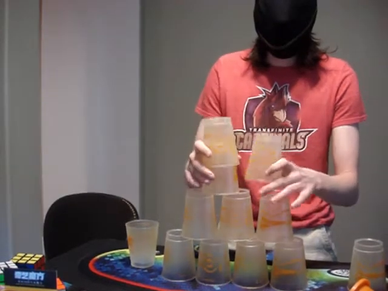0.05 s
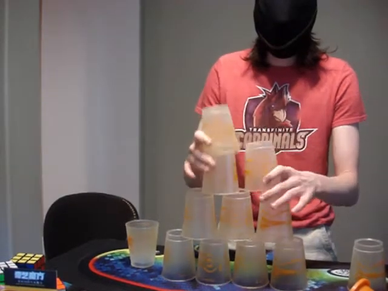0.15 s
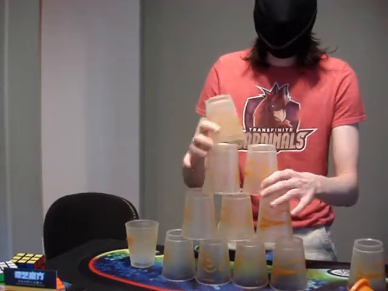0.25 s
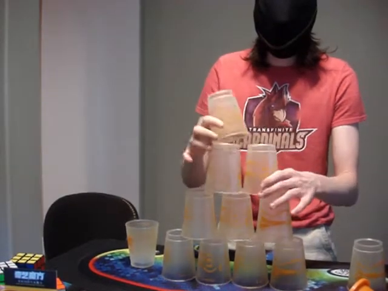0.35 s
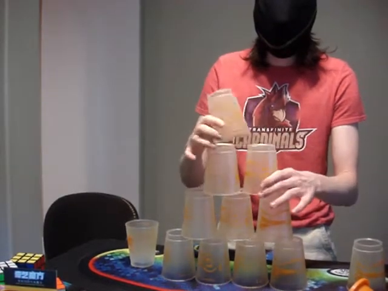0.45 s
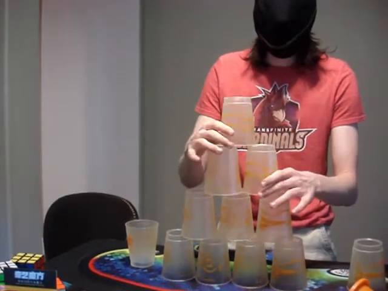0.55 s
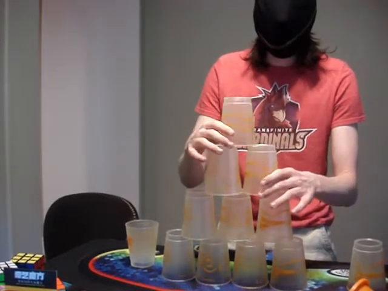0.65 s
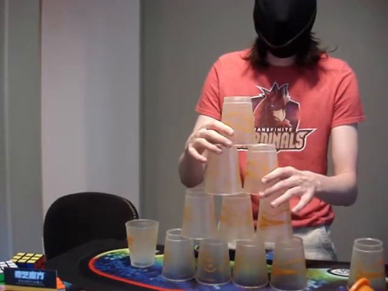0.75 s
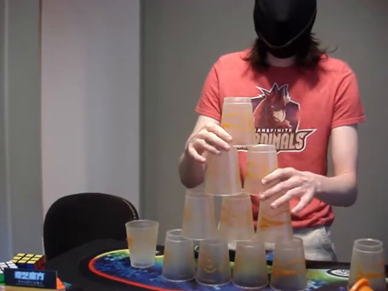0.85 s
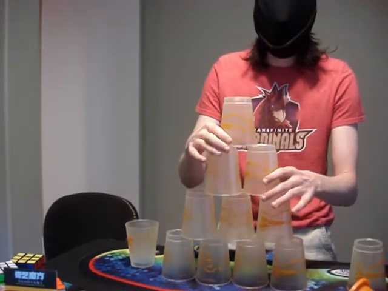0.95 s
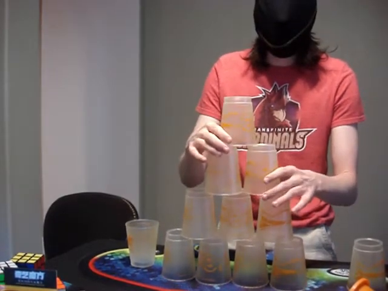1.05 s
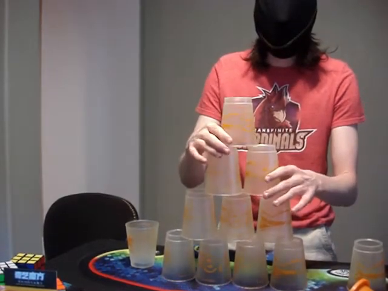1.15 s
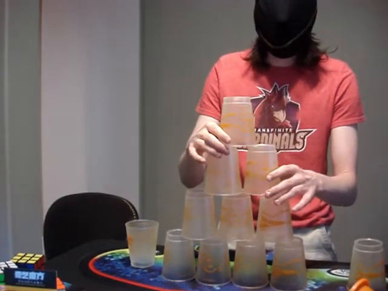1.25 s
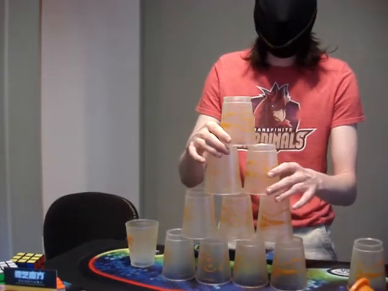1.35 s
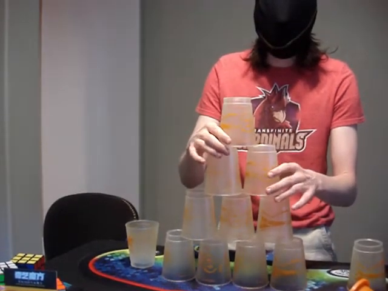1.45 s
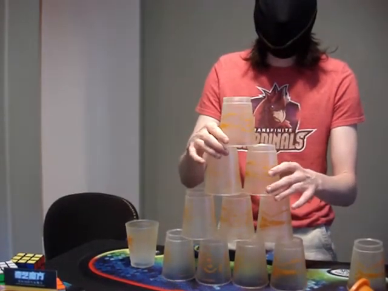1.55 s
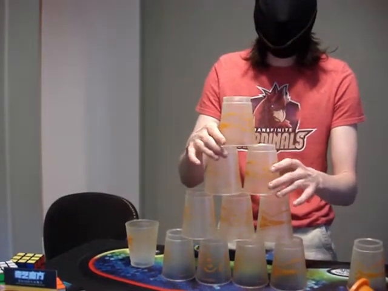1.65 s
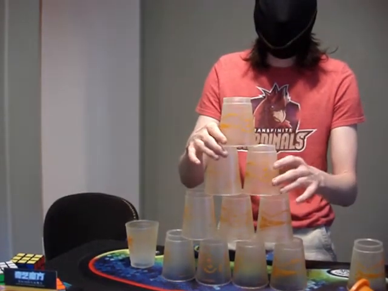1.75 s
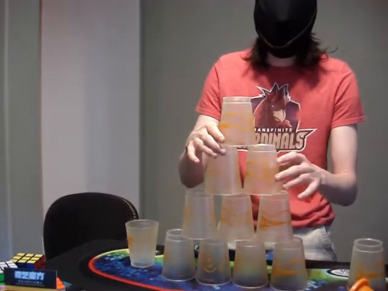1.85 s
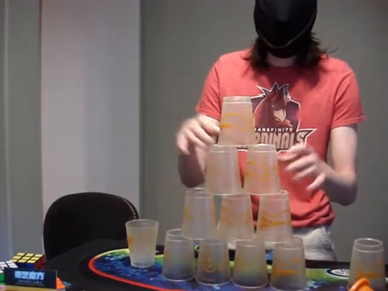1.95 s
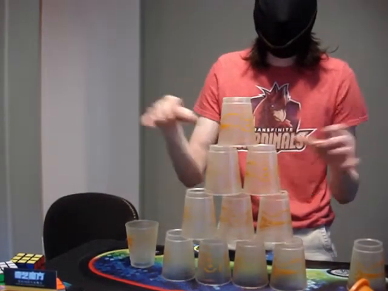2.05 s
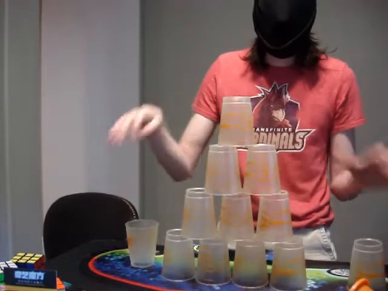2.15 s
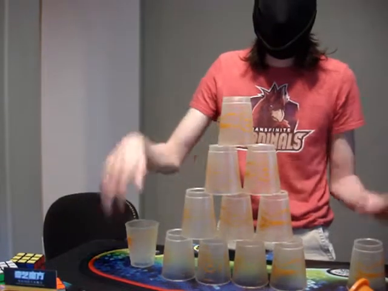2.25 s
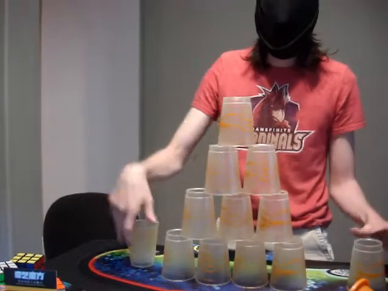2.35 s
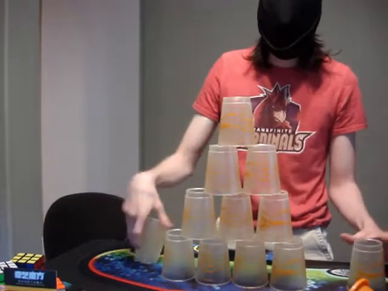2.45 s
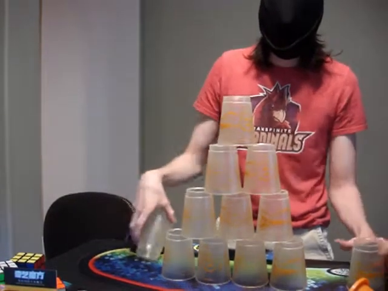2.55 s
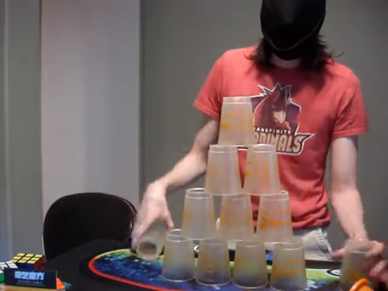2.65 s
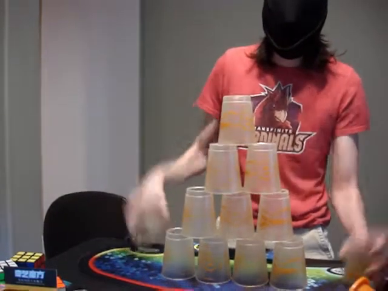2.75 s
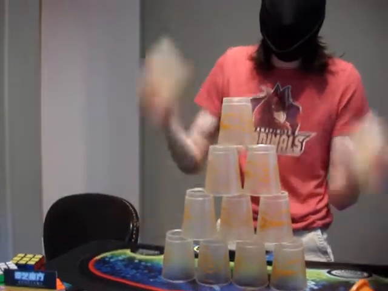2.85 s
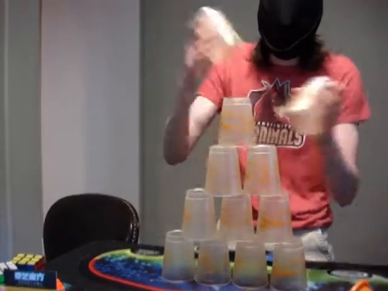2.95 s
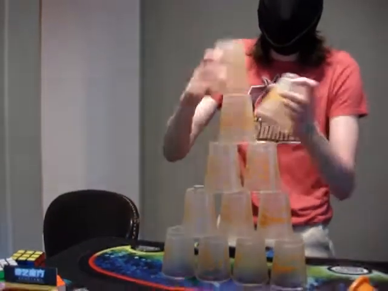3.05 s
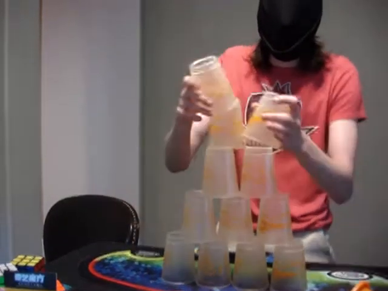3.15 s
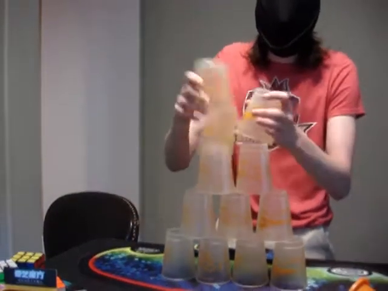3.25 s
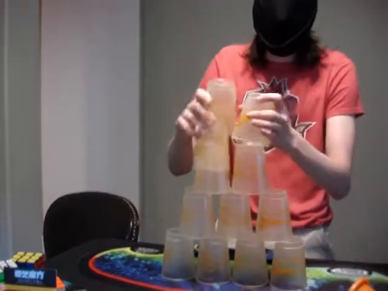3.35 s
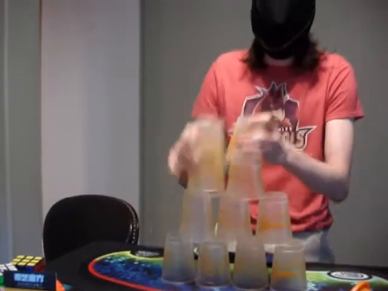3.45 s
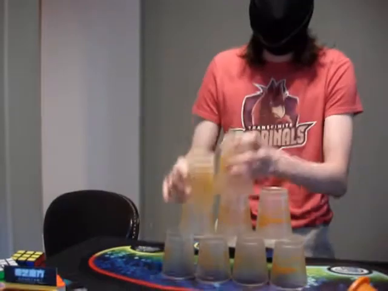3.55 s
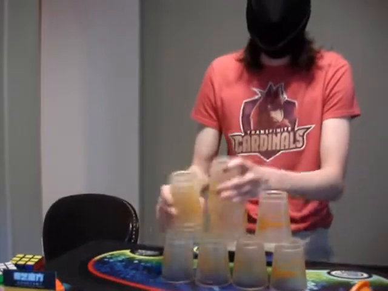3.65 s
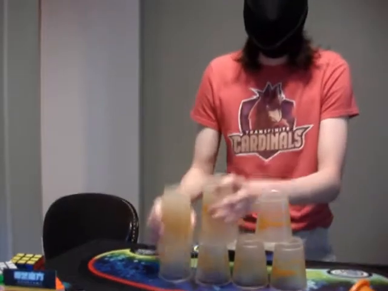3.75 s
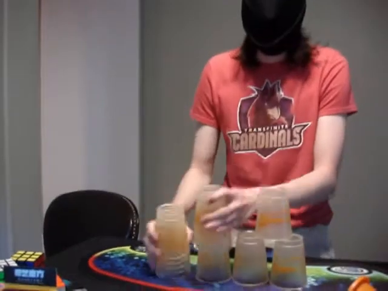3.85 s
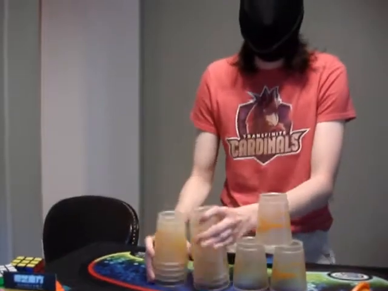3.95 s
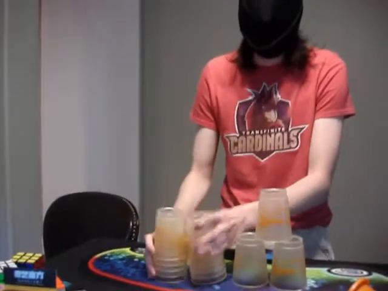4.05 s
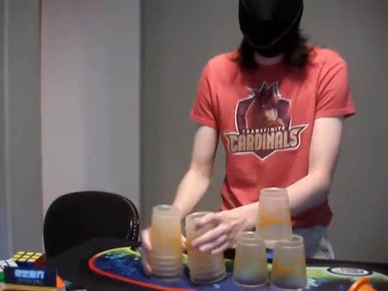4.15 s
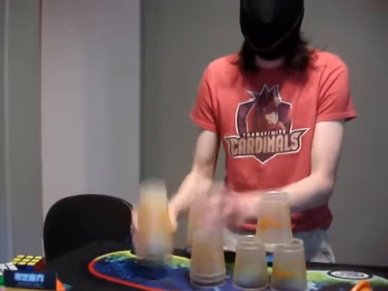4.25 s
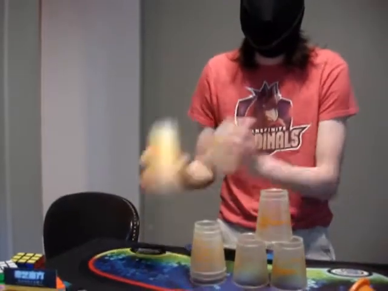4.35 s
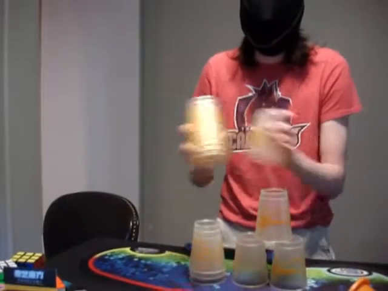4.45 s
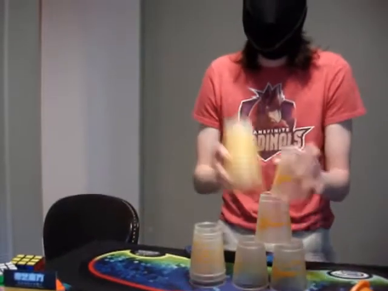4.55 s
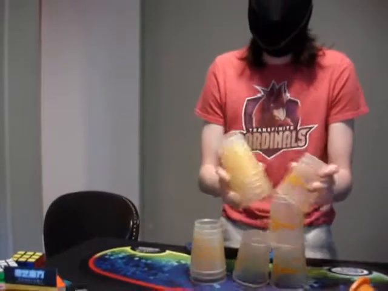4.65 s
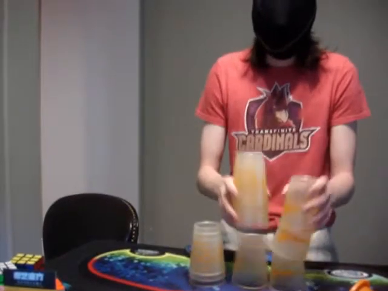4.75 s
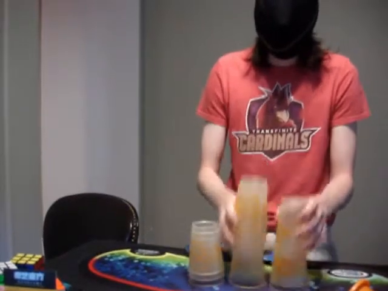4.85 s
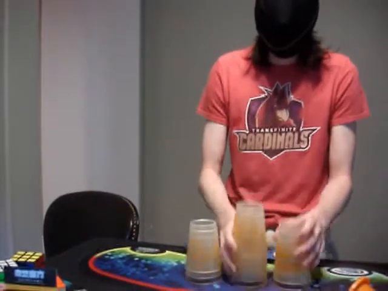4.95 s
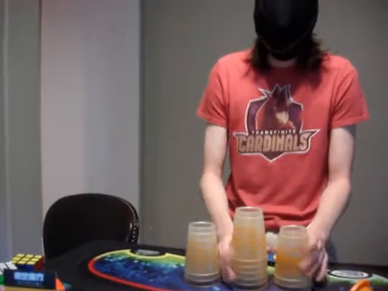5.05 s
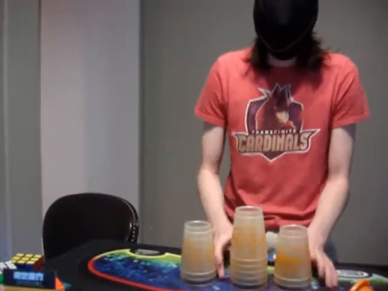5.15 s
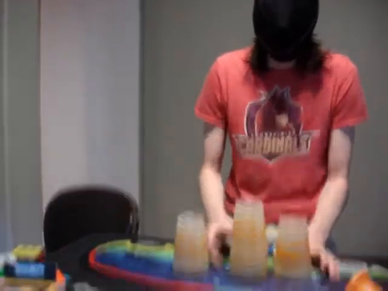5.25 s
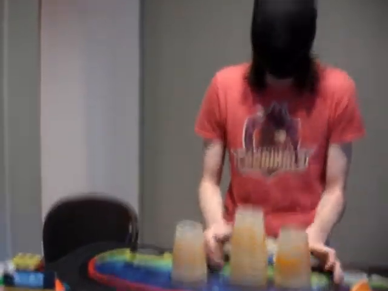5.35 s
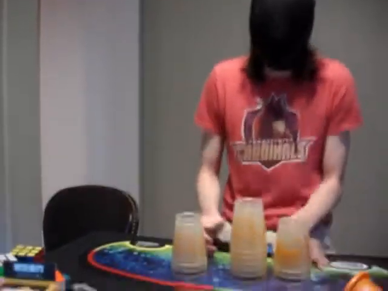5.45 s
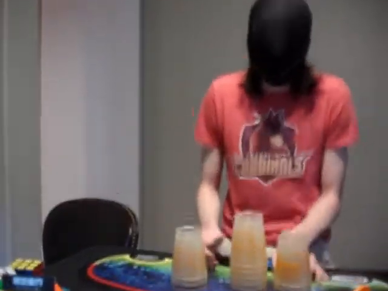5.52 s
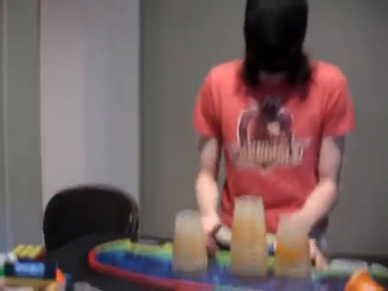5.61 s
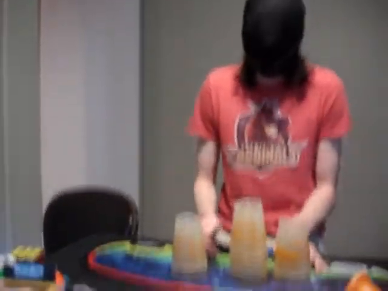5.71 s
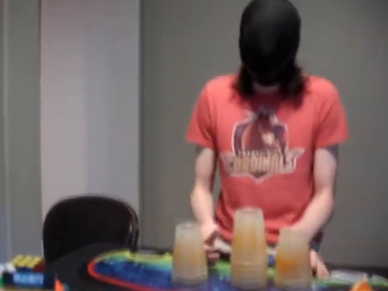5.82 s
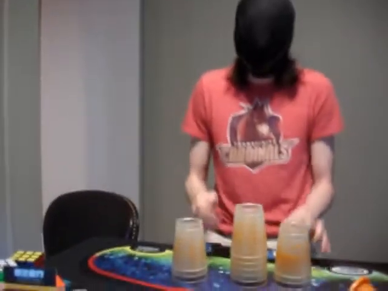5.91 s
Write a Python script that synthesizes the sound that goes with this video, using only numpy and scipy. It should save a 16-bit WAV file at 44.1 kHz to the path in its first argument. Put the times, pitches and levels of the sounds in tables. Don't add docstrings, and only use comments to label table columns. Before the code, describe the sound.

Close, bright clatter of hollow plastic cups being stacked and swept together in quick bursts, with dull table knocks over steady hiss.

```python
import sys
import numpy as np
from scipy import signal
from scipy.fft import rfft, irfft
from scipy.io import wavfile
from scipy.ndimage import uniform_filter1d, minimum_filter1d

SR = 44100
rng = np.random.default_rng(int(sys.argv[2]) if len(sys.argv) > 2 else 0)


def generate_wav(signal):
    frames = np.transpose(np.atleast_2d(signal))
    scaled = np.clip(frames, -1, 1) * 32767
    pcm = np.round(scaled).astype(np.int16)
    wavfile.write(sys.argv[1], SR, pcm)


def convert_level_to_amplitude(level_db):
    exponent = np.asarray(level_db, float) / 20
    return 10 ** exponent


N = 263702

# start in seconds, rim tick peak in dB, air note in dB, wall note in Hz, wall
# note in dB.
BUILD_HITS = [(0.0034, -36, -32, 900, -31.5), (0.0326, -31.5, -37, 980, -29.5),
              (0.0414, -34, -29, 846, -33), (0.2044, -12.5, -8.5, 994, -18),
              (0.2568, -12, -15.5, 1276, -13), (0.2793, -12, -14.5, 1226, -16),
              (0.4229, -18, -23, 1297, -20), (0.4415, -3.5, -12.5, 1200, -9),
              (0.5232, -15, -10.5, 1300, -13.5), (0.5362, -9.5, -17.5, 1444, -12),
              (0.5761, -3.5, -8, 1030, -8), (0.5874, -10, -8, 1180, -8.5), (0.5994, -29, -30, 1100, -43),
              (0.9034, -35, -31, 1050, -37), (0.9218, -27, -28.5, 980, -28.5),
              (1.0021, -31, -28, 1046, -26), (1.1544, -28.5, -35, 925, -39)]
DOWN_STACK_HITS = [(3.1098, 1.5, -5, 1021, 0.5), (3.1211, 3, -11.5, 1432, 2), (3.1324, -14, -36, 1530, -16.5),
                   (3.1494, 0.5, -8.5, 961, -14), (3.1654, -15, -23, 1090, -7), (3.1896, -14, -10.5, 1547, -9),
                   (3.2044, -5.5, -12, 1430, -24), (3.2193, -33, -22, 1186, -10), (3.3134, -10, -20, 1040, -20),
                   (3.3292, -0.5, -10.5, 1093, -9.5), (3.337, -5.5, -21, 957, -14), (3.3438, -36, -30, 1266, -11),
                   (3.3852, -17, -18.5, 1174, -17), (3.4299, -8, -15.5, 900, -18), (3.4501, -7.5, -19, 980, -15.5),
                   (3.4706, -1.5, -10.5, 920, -6.5), (3.4894, -15, -13, 930, -32), (3.5552, 2.5, -25, 984, -15),
              (3.6044, 1.5, -23, 1507, -3.5), (3.6116, -4, -17.5, 1640, -11),
              (3.6533, -9, -27.5, 1535, -14), (3.6755, -3.5, -9, 953, -8.5), (3.746, -0.5, -29, 914, -6.5),
              (3.8255, -1, -15, 1116, -13), (3.8405, -24, -39, 988, -20), (3.8796, -2, -19.5, 1780, -9),
              (3.922, -5, -40, 1710, -18), (3.968, -17, -42, 1750, -17), (4.011, 1.5, -16, 1447, -11.5),
              (4.0494, -44, -41, 1496, -28), (4.0675, -48, -27, 1550, -19.5), (4.1224, -20, -31, 1670, -27)]
CLOSE_HITS = [(4.5994, -0.5, -9.5, 1247, -6.5), (4.6119, -3, -23, 1270, -10), (4.6249, -5, -4.5, 990, -22),
              (4.6364, -1, -26, 1240, -6.5), (4.6544, -40, -40, 1200, -14),
              (4.6744, -11, -15.5, 1220, -11.5), (4.6844, -12, -24, 1180, -24.5),
              (4.782, -20, -34, 1000, -23), (4.7985, -6.5, -39, 920, -16.5), (4.8179, -6.5, -18, 902, -46),
              (4.8663, -19, -23, 1033, -22), (4.9177, 3, -14.5, 1550, -7.5), (4.9302, -8.5, -52, 1330, -11),
              (4.9844, -8, -29, 1290, -15.5), (5.0145, 1, -13.5, 1510, -9.5),
              (5.0394, -31, -19, 1670, -18.5)]
# start in seconds, rim tick peak in dB.
FINGER_TOUCHES = [
    (2.7085, -24),
    (2.7162, -24),
    (5.2655, -28),
    (5.3144, -24),
    (5.5104, -25),
    (5.6865, -32),
    (5.7867, -25),
]
# frequency in Hz, width in Hz, level in dB.
RIM_MODES = [(1954, 830, 6), (3280, 470, 5.5), (4380, 970, 1), (5680, 410, 2), (6390, 890, -1),
             (7310, 3630, -8), (14000, 5000, -18.5)]
# start in seconds, peak in dB, note of the struck spot in Hz.
TABLE_THUMPS = [(0.203, -31.5, 227), (0.263, -22.5, 170), (0.44, -23, 304), (0.576, -17, 190),
                (1.228, -27, 223), (2.476, -29.5, 207), (2.5, -36, 168), (2.714, -18.5, 186),
                (3.19, -18, 296), (3.33, -17.5, 323), (3.475, -16.5, 300), (3.677, -14, 295),
                (3.879, -12.5, 196.6), (3.908, -9.5, 161.5), (4.009, -18, 181), (4.331, -39.5, 115),
                (4.388, -38.5, 128), (4.6, -17.5, 275), (4.626, -9.5, 259.6), (4.826, -17.5, 206),
                (4.869, -13, 193.5), (5.024, -16, 180), (5.208, -21.5, 265.5), (5.264, -18, 293),
                (5.279, -22, 175), (5.513, -9.5, 242), (5.528, -12, 179), (5.548, -9.5, 199),
                (5.584, -31.5, 182)]
# frequency in Hz, level in dB, decay time T60 in seconds.
BOARD_MODES = [(124.1, -6, 0.28), (180, -4, 0.34), (242, -4, 0.052), (297.6, -1.5, 0.1), (375, -8.5, 0.082),
               (418, -10, 0.064)]
# start in seconds, length in seconds, peak in dB.
CUP_SLIDES = [
    (3.24, 0.26, -30),
    (3.46, 0.18, -20.5),
    (3.68, .17, -22),
    (3.89, .12, -31),
    (4.77, 0.19, -34),
    (4.91, 0.05, -30),
    (5.22, 0.14, -44),
    (5.51, 0.078, -40),
]
# frequency in Hz, level in dB per Hz.
SLIDE_SPECTRUM = [(100, -14.5), (300, -12), (600, 7.5), (1300, 5.5), (2100, -2), (5500, -10.5), (9800, -21),
                  (20000, -35)]
# start in seconds, length in seconds, peak in dB.
MAT_BRUSHES = [
    (2.43, 0.14, -55.5),
    (2.62, 0.15, -58.5),
    (2.702, 0.1, -44),
    (2.8, .24, -51.5),
    (4.295, 0.056, -41.5),
    (4.79, 0.23, -35.5),
    (5.19, 0.08, -54),
]
# start in seconds, peak in dB.
FAR_SLAPS = [
    (1.2171, -15),
    (1.2257, -11.5),
    (1.235, -14.5),
]
# frequency in Hz, width in Hz, level in dB.
SLAP_MODES = [(300, 330, -47), (637, 250, 13.5), (1200, 345, 15.5), (2110, 150, 18.5), (3000, 580, 9),
              (3700, 600, 10.5), (5400, 4000, -8), (14630, 480, -8)]
# start in seconds, frequency in Hz, level in dB, T60 in seconds.
THIN_PART_RING = (1.235, 2105.5, -26, 0.06)
# delay in seconds, level in dB.
FIRST_ECHOES = [
    (.0045, -14),
    (.0125, -9),
    (.0215, -15),
]
# frequency in Hz, T60 in seconds.
ROOM_DECAY = [(100, 0.24), (260, 0.73), (700, 0.45), (1840, 0.65), (4850, 0.7), (10000, 0.47)]
# frequency in Hz, level in dB per Hz.
HISS_SPECTRUM = [(12, -60.5), (20, -21.5), (91, -15.5), (114, -11), (230, -6), (250, -11), (360, -4.5),
                 (565, -7.5), (632, -4.5), (1140, -9), (1600, -10.5), (7690, -24.5), (9890, -35),
                 (10800, -65.5), (16400, -56)]
# frequency in Hz, gain in dB.
MIC_RESPONSE = [(20, 0), (90, -6), (125, 0), (9900, -3.5), (10150, -21), (11000, -25), (11800, -30),
                (13500, -19.5), (15600, -18), (15900, -56), (16700, -85)]

AIR_HZ, AIR_SCATTER = 620.5, 0.082
TOUCH_AIR_DB, TOUCH_WALL_DB, TOUCH_WALL_HZ = -13, -18.5, 1240
RIM_LAG_S = 0.0012
CHATTER_DB, CHATTER_S = -15, 0.0045
STIFF_RATIO, STIFF_T60 = 1.227, 0.055
SLIDE_PEAK, BRUSH_PEAK = 0.37, 0.12
TICK_ROOM_DB = -3
HISS_DB = -46.5
HUM_HZ, HUM_DB = 125.3, -65.5


def evened(x):
    return x / np.sqrt(np.mean(x ** 2) + 1e-20)


def peaked(x):
    return x / np.abs(x).max()


def read(points, hz):
    f, value = np.transpose(points)
    return np.interp(np.log(hz + 1), np.log(f + 1), value)


def add(mix, s, sound):
    part = mix[round(s * SR):][:len(sound)]
    part += sound[:len(part)]


def colour(x, points):
    gain = convert_level_to_amplitude(read(points, np.fft.rfftfreq(len(x), 1 / SR)))
    return irfft(rfft(x) * gain, len(x))


def ring(x, hz, width):
    r = np.exp(-np.pi * abs(width) / SR)
    angle = 2 * np.pi * hz / SR
    return signal.lfilter([1 - r * r], [1, -2 * r * np.cos(angle), r * r], x) * np.sin(angle)


def body(x, modes):
    return sum((-1) ** k * convert_level_to_amplitude(db) * ring(x, hz, width) for k, (hz, width, db) in enumerate(modes))


def note(hz, t60, rise):
    t = np.arange(round(0.6 * SR)) / SR
    swell = 1 - np.exp(-t / rise)
    return peaked(np.sin(2 * np.pi * hz * t) * swell * convert_level_to_amplitude(-60 * t / t60))


def stroke(rows, peak):
    out, t = np.zeros(N), np.arange(N) / SR
    for s, length, db in rows:
        u = np.clip((t - s) / length, 0, 1)
        out += convert_level_to_amplitude(db) * np.minimum(u / peak, (1 - u) / (1 - peak)) ** 0.46
    return out


def contacts():
    light = [(s, db, db + TOUCH_AIR_DB, TOUCH_WALL_HZ, db + TOUCH_WALL_DB) for s, db in FINGER_TOUCHES]
    rows = BUILD_HITS + DOWN_STACK_HITS + CLOSE_HITS + light
    grip = 1 + AIR_SCATTER * np.clip(rng.standard_normal(len(rows)), -2, 2)
    return [(s, tick_db, AIR_HZ * g, air_db, wall_hz, wall_db)
            for (s, tick_db, air_db, wall_hz, wall_db), g in zip(rows, grip)]


def rims(hits):
    out, t = np.zeros(N), np.arange(2000) / SR
    tick = np.diff(np.exp(-t / 0.00008), prepend=0)
    for s, tick_db, *_ in hits:
        chatter = convert_level_to_amplitude(CHATTER_DB) * rng.standard_normal(2000) * np.exp(-t / CHATTER_S)
        add(out, s + RIM_LAG_S, convert_level_to_amplitude(tick_db - 3.15) * peaked(body(tick + chatter, RIM_MODES)))
    return out


def cups(hits):
    out = np.zeros(N)
    for s, _, air_hz, air_db, wall_hz, wall_db in hits:
        _, below, above = rng.uniform(-2.12, 1, 3)
        air = note(air_hz, 0.016, 0.0092) + 0.18 * note(air_hz * 0.747, 0.034, 0.0021)
        add(out, s, convert_level_to_amplitude(air_db + 3) * air)
        near = note(wall_hz * (0.8 + 0.07 * below), 0.02, 0.0004)
        near = near + 0.5 * note(wall_hz * (1.12 + 0.05 * above), 0.02, 0.0004)
        add(out, s, convert_level_to_amplitude(wall_db + 2) * (note(wall_hz, 0.029, 0.0008) - 0.5 * near))
    return out


def knocks(hits):
    out = np.zeros(N)
    for s, _, _, air_db, _, wall_db in hits:
        c = rng.uniform(-1.6, 1, 2)
        low = note(820 * (1 + 0.1 * c[0]), 0.012, 0.0003)
        high = note(1250 * (1 + 0.12 * c[1]), 0.008, 0.0002)
        add(out, s, convert_level_to_amplitude((air_db + wall_db) / 2 - 4) * (low - 1.4 * high))
    return out


def table():
    out = np.zeros(N)
    for s, db, spot_hz in TABLE_THUMPS:
        share = rng.uniform(-1.9, 1, len(BOARD_MODES))
        board = sum(convert_level_to_amplitude(d + 2.8 * u) * note(hz, t60, 0.015) for (hz, d, t60), u in zip(BOARD_MODES, share))
        spot = note(spot_hz, 0.11, 0.0042)
        pressed = note(spot_hz * STIFF_RATIO, STIFF_T60, 0.0011)
        add(out, s, convert_level_to_amplitude(db - 5) * peaked(0.97 * board + 1.45 * spot + 0.7 * pressed))
    return out


def grains():
    force_db = 2.5 * np.minimum(rng.exponential(1, N), 3)
    touching = rng.random(N) < 0.15
    return rng.standard_normal(N) * convert_level_to_amplitude(force_db) * touching


def slides():
    return convert_level_to_amplitude(3) * stroke(CUP_SLIDES, SLIDE_PEAK) * evened(colour(grains(), SLIDE_SPECTRUM))


def brushes():
    rub = grains()
    return convert_level_to_amplitude(2) * stroke(MAT_BRUSHES, BRUSH_PEAK) * evened(ring(rub, 5500, 4000) + 1.1 * ring(rub, 800, 900))


def slap():
    out, t = np.zeros(N), np.arange(6000) / SR
    low_cut = signal.butter(2, 220, "high", fs=SR)
    for s, db in FAR_SLAPS:
        burst = rng.standard_normal(6000) * np.exp(-t / 0.018)
        add(out, s, convert_level_to_amplitude(db) * peaked(signal.lfilter(*low_cut, body(burst, SLAP_MODES))))
    s, hz, db, t60 = THIN_PART_RING
    add(out, s, convert_level_to_amplitude(db) * note(hz, t60, 0.0048))
    return out


def echoes(x):
    out = np.zeros(N)
    for s, db in FIRST_ECHOES:
        add(out, s, convert_level_to_amplitude(db) * x[:N - round(s * SR)])
    return out


def room(x):
    out = np.zeros(N)
    turn = 2 * np.pi * 3.7 * np.arange(N) / SR
    for k in range(3):
        taps, at = np.zeros(SR), np.arange(200, SR - 20, 20)
        taps[at + rng.integers(0, 20, len(at))] = rng.choice([-1., 1.], len(at))
        hz, t, z = signal.stft(taps, SR, nperseg=256)
        decay = convert_level_to_amplitude(-60 * t / read(ROOM_DECAY, hz)[:, None]) + 0.067 * convert_level_to_amplitude(-60 * t / 0.59)
        tail = signal.istft(z * decay, SR, nperseg=256)[1]
        share = np.sqrt(2 / 3) * np.cos(turn + k * np.pi / 3)
        out += signal.fftconvolve(x * share, tail / np.linalg.norm(tail))[:N]
    return out


def hiss():
    hum = evened(ring(rng.standard_normal(N), HUM_HZ, 0.9))
    air = evened(colour(rng.standard_normal(N), HISS_SPECTRUM))
    return convert_level_to_amplitude(HISS_DB) * air + convert_level_to_amplitude(HUM_DB) * hum


def scene():
    hits = contacts()
    ticks, notes, knock = rims(hits), cups(hits), knocks(hits)
    rub, board, far = slides() + brushes(), table(), slap()
    cup_send = convert_level_to_amplitude(-6) * notes + convert_level_to_amplitude(3) * knock
    send = convert_level_to_amplitude(TICK_ROOM_DB) * ticks + convert_level_to_amplitude(2.5) * cup_send + convert_level_to_amplitude(-3) * rub
    wet = room(send + convert_level_to_amplitude(-8) * board + convert_level_to_amplitude(7.5) * far)
    near = ticks + notes + knock + rub
    return (near + echoes(near) + board + far + wet)[None]


def dips_before_onsets(x):
    hz, t, z = signal.stft(x, SR, nperseg=128, noverlap=96)
    power = uniform_filter1d(uniform_filter1d(abs(z) ** 2, size=5, axis=0), size=3)
    level_db = 10 * np.log10(power + 1e-14)
    ahead_db = -minimum_filter1d(-level_db, size=33, axis=1, origin=-16)
    close_db = -minimum_filter1d(-level_db, size=7, axis=1, origin=-3)
    margin_db = np.interp(hz, [0, 700, 2500, 5000, 8000, 10000, 10400], [60, 27, 21, 15, 10, 12, 60])
    lost = np.clip((ahead_db - level_db - margin_db[:, None]) / 4, 0, 1)
    smear = convert_level_to_amplitude(close_db - 27) * np.exp(2j * np.pi * rng.random(z.shape))
    return signal.istft(z * convert_level_to_amplitude(-30 * lost) + smear, SR, nperseg=128, noverlap=96)[1][:N]


def band_limit(x):
    return signal.sosfilt(signal.butter(12, 16630, fs=SR, output="sos"), x)


def record(dry):
    overloaded = dry[0] / (1 + abs(dry[0] / 1.06) ** 10) ** (1 / 10)
    heard = colour(overloaded, MIC_RESPONSE) + hiss()
    return band_limit(dips_before_onsets(heard)[None])


dry = scene()
out = record(dry)
generate_wav(out)
```